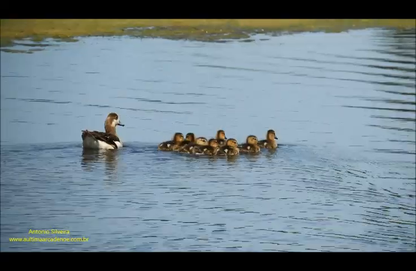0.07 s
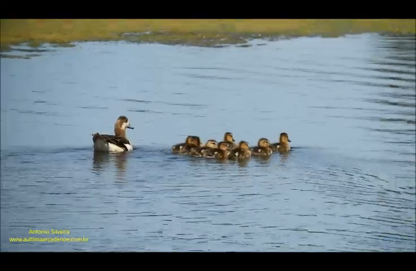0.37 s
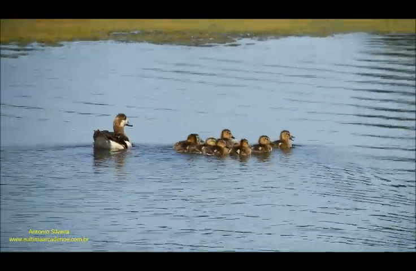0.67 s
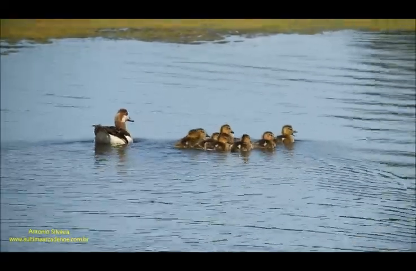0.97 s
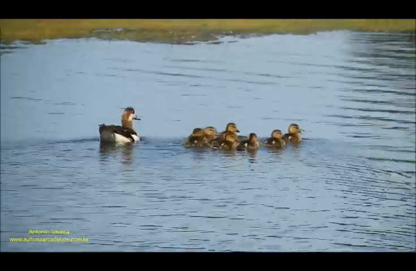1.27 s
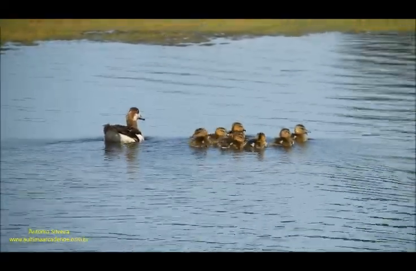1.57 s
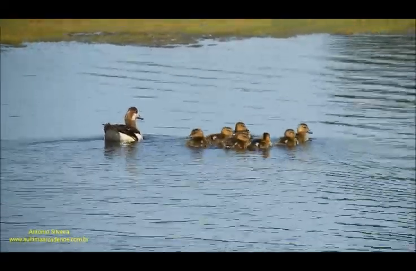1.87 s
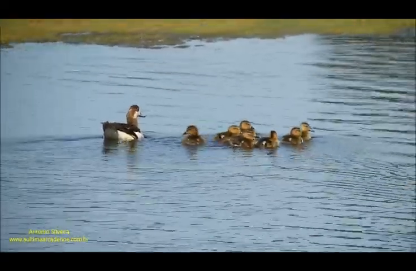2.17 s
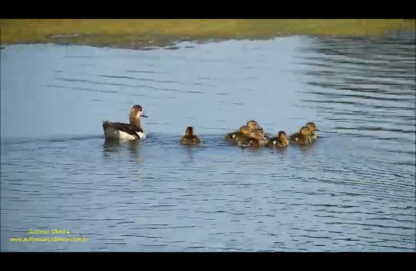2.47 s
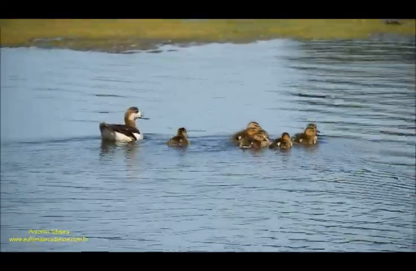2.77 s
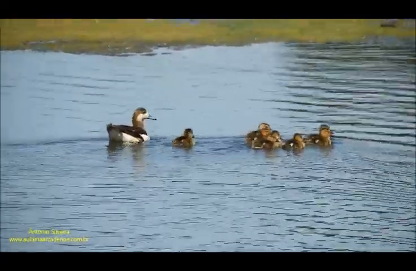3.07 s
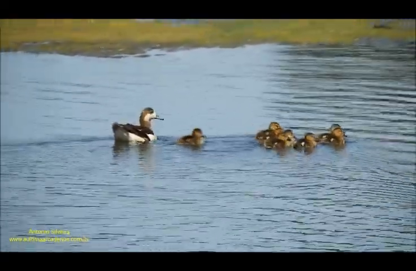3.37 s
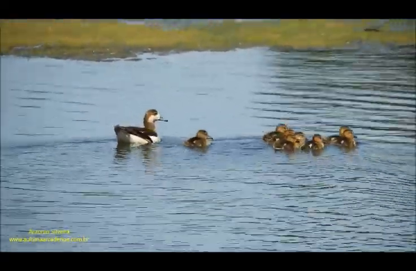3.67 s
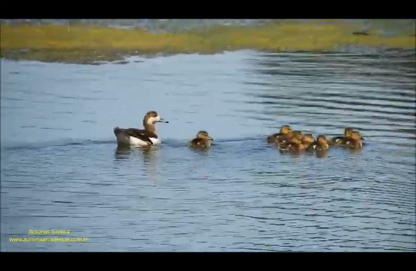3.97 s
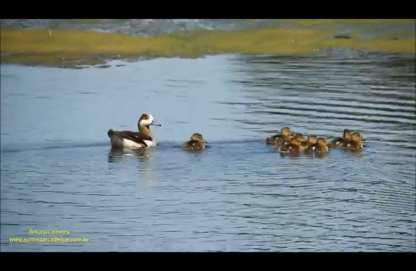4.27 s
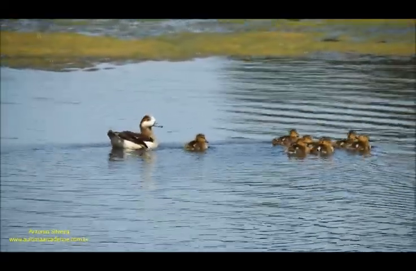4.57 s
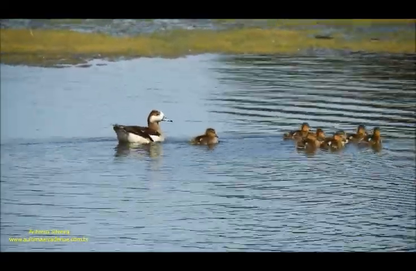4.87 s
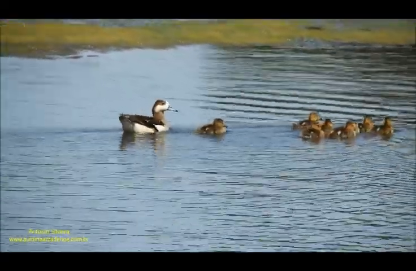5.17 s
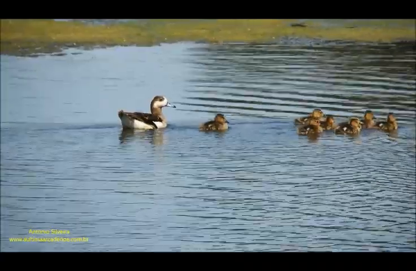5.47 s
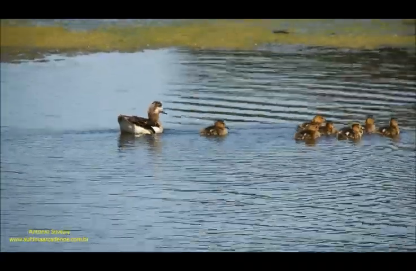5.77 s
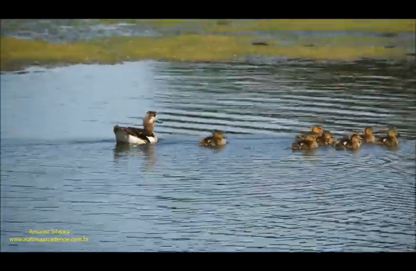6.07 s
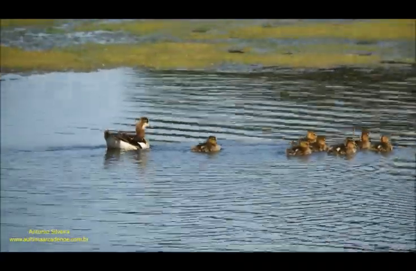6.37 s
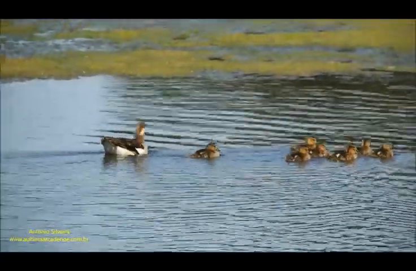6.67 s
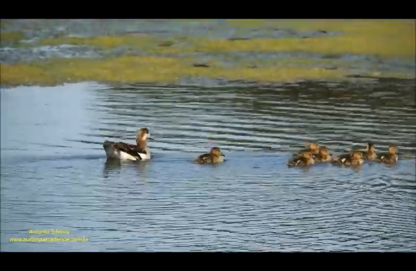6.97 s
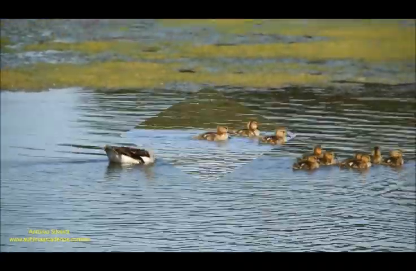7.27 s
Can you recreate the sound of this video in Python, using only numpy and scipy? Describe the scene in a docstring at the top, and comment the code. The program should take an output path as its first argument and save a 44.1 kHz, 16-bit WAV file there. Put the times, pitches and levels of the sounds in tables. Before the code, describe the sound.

Outdoors by a pond, low wind buffets the microphone over a soft hiss and a high, continuous insect buzz. Duckling peeps are faint at first. Once the gusts die down, distant birds twitter briefly, and loud, high peeps and downward whistles follow from ducklings nearby on the left. Just before the end the hiss brightens and the buzz spreads to both sides.

```python
"""Ducklings on a pond

Ducklings swim after their mother with thin arched peeps and long falling whistles, faint at first,
then close and to the left, echoed by the banks. Birds call faintly far away. Two bush crickets buzz
with their wings on the right, over a steady outdoor hiss, and gusts of wind rumble on the microphone.
Near the end a brighter wash of noise comes in and the buzz is heard on both sides."""
import sys
import numpy as np
from scipy import signal
from scipy.fft import rfft, irfft, next_fast_len
from scipy.io import wavfile
from scipy.ndimage import uniform_filter1d

SR = 44100
rng = np.random.default_rng(int(sys.argv[2]) if len(sys.argv) > 2 else 0)


def wav_record(signal):
    """Record a signal, one row per channel, as 16-bit PCM in the file named by sys.argv[1]."""
    frames = np.transpose(np.atleast_2d(signal))
    bounded = np.clip(frames, -1, 1)
    # unit amplitude maps onto the largest positive 16-bit level
    quanta = np.round(bounded * 32767).astype(np.int16)
    wavfile.write(sys.argv[1], SR, quanta)


N = 323694
T = np.arange(N) / SR


def undb(db):
    """Turn decibels into a gain."""
    return 10 ** (np.asarray(db) / 20)


def unit(x):
    """Scale a signal to an average power of 1."""
    return x / np.sqrt(np.mean(x ** 2))


def curves(rows):
    """Join a table's rows with straight lines in time, one curve per column."""
    times, *columns = np.transpose(rows)
    return [np.interp(T, times, column) for column in columns]


def drift(rate):
    """A smooth random wobble of size about 1 that changes about rate times a second."""
    knots = rng.standard_normal(N // 8)
    line = np.interp(T * rate, np.arange(len(knots)), knots)
    return unit(uniform_filter1d(line, max(int(SR / rate / 2), 1)))


def noise(colour):
    """Noise of power 1, with lows and highs shaped by (pitch_hz, level_db) rows."""
    hz, db = np.transpose(colour)
    size = next_fast_len(N)
    bins_hz = np.maximum(np.fft.rfftfreq(size, 1 / SR), 1)
    gain = undb(np.interp(np.log(bins_hz), np.log(hz), db))
    return unit(irfft(rfft(rng.standard_normal(size)) * gain, size)[:N])


def blend(a, b, share):
    """Mix a share of b into a at constant power."""
    share = np.clip(share, 0, 1)
    return np.sqrt(1 - share) * a + np.sqrt(share) * b


def stereo_noise(colour, alike):
    """Left and right noise, from unrelated (alike=0) to the same (alike=1)."""
    common = noise(colour)
    return blend(np.array([noise(colour), noise(colour)]), common, alike)


def phase_of(hz):
    """The running angle of a wave whose pitch changes."""
    return 2 * np.pi * np.cumsum(hz) / SR


# Level of the background murmur, which dips while loud gusts hit the microphone: time_s, level_db
MURMUR_LEVEL = [(.1, -53.5), (.4, -58.5), (.8, -54), (1.8, -55), (2.7, -56.5), (3.4, -62.5), (3.65, -53),
                (4.8, -52.5), (5.6, -52.5), (6.4, -55.5), (7.0, -56)]
# Its tone colour: pitch_hz, level_db
MURMUR_COLOUR = [(100, -20), (250, 2.5), (450, -3.5), (1000, -6.5), (1500, -12), (2300, -13), (4000, -8.5),
                 (9000, -25.5)]


def murmur(boost_db=3.0, swell_db=1.5):
    """A dull murmur from the far shore, in two layers that swell separately."""
    slow, fast = (stereo_noise(MURMUR_COLOUR, alike=.51) * undb(swell_db * drift(rate))
                  for rate in (14, 30))
    lean_left = undb([[.5], [-.5]])
    return blend(slow, fast, .39) * undb(curves(MURMUR_LEVEL)[0] + boost_db) * lean_left


# Level of the hiss: time_s, left_db, right_db
HISS_LEVEL = [(.1, -46, -50), (1.9, -49, -49.5), (3.3, -47, -49), (5.0, -42.5, -46), (7.3, -41, -44)]
# Its tone colour: pitch_hz, left_db, right_db
HISS_COLOUR = [(1460, -19, -10.5), (3490, -10, -8), (3960, -0.5, -11.5), (4580, 4, 1), (5400, 0, -3),
               (6540, -10, 0.5), (8060, -14.5, 2.5), (9530, -18, 3), (11680, -24.5, -8), (13300, -27, -14),
               (16200, -30, -31)]


def hiss(flicker_db=.7):
    """A high, slightly flickering hiss, different on each side."""
    hz, *sides = np.transpose(HISS_COLOUR)
    return np.array([noise(np.column_stack([hz, colour])) * undb(db + flicker_db * drift(14))
                     for colour, db in zip(sides, curves(HISS_LEVEL))])


WASH_START_S = 7.045
# Tone colour of the wash: pitch_hz, level_db
WASH_COLOUR = [(200, 14.5), (500, 6), (1200, 2), (2500, -0.5), (5000, 4), (8000, 5), (10000, 3.5),
               (12000, -12), (15500, -31)]


def wash(level_db=-44, fade_in_s=.0034):
    """A brighter rush of noise that steps in near the end."""
    fade_in = np.clip((T - WASH_START_S) / fade_in_s, 0, 1)
    return stereo_noise(WASH_COLOUR, alike=.41) * undb(level_db) * fade_in


def sliding_note(middle_s, length_s, hz, hz_per_s, db):
    """One soft note that swells and fades while its pitch slides."""
    out, t = np.zeros(N), T - middle_s
    on = np.abs(t) < length_s / 2
    swell = np.cos(np.pi * t[on] / length_s)
    out[on] = np.sqrt(2) * undb(db) * swell * np.sin(phase_of(hz + hz_per_s * t[on]))
    return out


# Low bird calls: middle_s, length_s, pitch_hz, slide_hz_per_s, level_db
FAR_CALLS = [(4.71, .13, 1410, -300, -64), (5.132, .26, 970, -600, -62)]


def far_birds(flicker_db=4):
    """Distant calls that flicker on their way over the water."""
    return sum(sliding_note(*call) for call in FAR_CALLS) * undb(flicker_db * drift(70))


# A lower and a higher chirping voice: pitch_hz, spread_hz, level_db
FAR_VOICES = [(3690, 295, -54), (4610, 450, -52)]


def far_chirps(per_voice=44, span_s=(3.85, 5.5), length_s=.05, slide_hz_per_s=8000, blur_s=.2):
    """Faint chirps at random times and pitches, blurred by the reeds on the way."""
    chirps = np.zeros(N)
    for centre_hz, spread_hz, db in FAR_VOICES:
        for when, pitch, slope, size in rng.uniform(-1, 1, (per_voice, 4)):
            middle_s = np.interp(when, (-1, 1), span_s)
            hz = centre_hz + spread_hz * pitch
            chirps += sliding_note(middle_s, length_s, hz, slide_hz_per_s * slope, db + 2 * size)
    reeds = rng.standard_normal(SR // 2) * undb(-60 * T[:SR // 2] / blur_s)
    return signal.fftconvolve(chirps, reeds / np.sqrt(np.sum(reeds ** 2)))[:N]


# Slow swells of wind: time_s, left_db, right_db
GUSTS = [(.1, -43, -47), (.45, -32, -43), (.65, -48, -48), (1.2, -46.5, -52), (1.45, -37, -45),
         (1.8, -48, -46), (2.05, -38.5, -46), (2.27, -26.5, -44), (2.46, -44.5, -48), (2.7, -35.5, -32.5),
         (2.95, -42, -32.5), (3.07, -27.5, -33), (3.17, -28, -30.5), (3.35, -19, -25), (3.47, -24.5, -22.5),
         (3.56, -36, -42), (3.65, -51, -52), (7.0, -52, -64), (7.04, -38.5, -48), (7.28, -31.5, -32.5),
         (7.34, -37, -34)]
# Short puffs on top of them: time_s, left_db, right_db
PUFFS = [(.175, -31, -48), (.225, -25.5, -34), (.285, -26, -38), (.39, -22.5, -45), (.435, -24.5, -49),
         (.52, -26.5, -38), (1.73, -44, -32.5), (1.994, -49, -28), (2.12, -30, -50), (2.274, -24.5, -45),
         (2.68, -26.5, -46), (2.72, -38, -33), (2.85, -30, -23.5), (2.93, -42, -26.5), (2.989, -32, -22),
         (3.024, -24, -42), (3.1, -15.5, -25), (3.169, -28, -22), (3.237, -18, -29), (3.31, -14.5, -27),
         (3.38, -14.5, -29), (3.445, -30, -19.5)]
# Tone colour of the gusts: pitch_hz, level_db
GUST_COLOUR = [(20, -23), (40, -1), (62, 2), (95, 2.5), (125, -1.5), (190, -13.5), (240, -29), (400, -41),
               (900, -53.5), (8000, -100)]
# Tone colour of the rumble between them: pitch_hz, level_db
RUMBLE_COLOUR = [(20, -22), (45, 0.5), (80, -2), (135, 0.5), (205, -2.5), (255, -23.5), (400, -25.5),
                 (900, -36), (8000, -103)]


def wind(rumble_db=-45, flutter_db=1.16, pitch_ratio=1.31, puff_s=.017):
    """Swirling air hits each side of the microphone, higher in strong gusts, over a steady rumble."""
    power = undb(curves(GUSTS)) ** 2
    for time_s, *sides_db in PUFFS:
        puff = np.exp(-((T - time_s) / puff_s) ** 2 / 2)
        power += np.outer(undb(sides_db), puff) ** 2
    low = stereo_noise(GUST_COLOUR, alike=.3)
    high = stereo_noise([(hz * pitch_ratio, db) for hz, db in GUST_COLOUR], alike=.21)
    high_share = (10 * np.log10(power) + 28) / 10  # none at -28 dB, all at -18 dB
    flutter = undb(flutter_db * np.array([drift(22), drift(22)]))
    gusts = blend(low, high, high_share) * flutter * np.sqrt(power)
    return gusts + stereo_noise(RUMBLE_COLOUR, alike=.91) * undb(rumble_db)


# Level of the two crickets: time_s, lower_cricket_db, higher_cricket_db
CRICKET_LEVELS = [(.1, -47, -50), (2.5, -47.5, -49), (5.0, -53, -50), (7.3, -48, -48)]
# Tone colour of their buzz once the reeds scatter it: pitch_hz, level_db
BUZZ_COLOUR = [(5000, -62), (6900, -3), (7250, 4), (7400, -33), (7560, 1), (7800, 6.5), (8030, -10),
               (8270, 4), (8600, -23), (11000, -46)]


def crickets(notes_hz=(7600, 8310), bend_hz=260, scrape_hz=60, left_db=-15, scattered_share=.26):
    """Each stroke rings the wing on the insect's own note, then the wing swings back silently."""
    strokes_hz, in_step_s = (60.58, 60.82), 2.1  # close rates slide in and out of step
    direct, power = np.zeros((2, N)), 0
    for db, note_hz, stroke_hz in zip(curves(CRICKET_LEVELS), notes_hz, strokes_hz):
        swing = np.cos(2 * np.pi * stroke_hz * (T - in_step_s) + .044 * drift(50))
        speed = np.maximum(swing, 0)
        strength = speed ** .49 * undb(drift(90))
        hz = note_hz - bend_hz * (1 - speed)  # the note sags where the wing is slow
        for side in direct:
            side += undb(db) * unit(strength * np.sin(phase_of(hz + scrape_hz * drift(1500))))
        power += undb(db) ** 2
    scattered = np.sqrt(power) * stereo_noise(BUZZ_COLOUR, alike=0)
    left, right = blend(direct, scattered, scattered_share)
    # the left side is quieter until the wash comes in
    return np.array([left * undb(left_db * (T < WASH_START_S)), right])


# Echoes off the banks: delay_s, left_db, right_db
BANKS = [(0.0206, -12.5, -19.5), (.071, -20.5, -44)]


def pond_echoes(calls, right_db=-18, scatter_db=(-15, -19), die_away_s=.34):
    """Calls arrive directly, then off the banks and scattered by the plants along the shore."""
    t = T[:SR]
    tail = rng.standard_normal((2, SR)) * undb(-60 * t / die_away_s) * np.clip(t / .02, 0, 1)
    paths = tail / np.sqrt(np.sum(tail ** 2, axis=1, keepdims=True)) * undb(scatter_db)[:, None]
    paths[0, 2] += 1  # the direct sound reaches the left side two samples later
    paths[1, 0] += undb(right_db)
    for delay_s, *sides_db in BANKS:
        paths[:, int(delay_s * SR)] += undb(sides_db)
    return signal.fftconvolve(calls[None], paths, axes=1)[:, :N]


# Short peeps: start_s, rise_s, fall_s, top_hz, sag_limit_hz, level_db, swell_slowness, trill_depth,
# rasp_db, thread_db (the thin tone before and after). The last two are relative to level_db.
PEEPS = [(.298, .052, .076, 4470, 1530, -44.5, 1.2, 0.4, -17, -17),
         (.588, 0.054, .06, 4600, 1570, -41, 2.5, 0.36, -13.5, -9),
         (.875, 0.075, 0.049, 4260, 1510, -44, 1.7, 0.14, 0, -8),
         (1.239, 0.072, 0.063, 4490, 1310, -41, 0.93, 0.25, -20, -15),
         (4.905, 0.021, 0.033, 4640, 1620, -45, .3, 0.3, -20, -6),
         (5.896, 0.0043, 0.038, 4520, 1400, -30.5, .2, 0.64, -32, -26),
         (6.085, 0.012, 0.03, 4320, 2000, -31, .2, 0.27, -22, -8),
         (6.325, .132, .025, 4516, 1550, -23, 1, 0.48, -30, -25),
         (6.584, .017, 0.027, 4280, 1680, -26, 0.26, 0.18, -19, -11),
         (6.985, 0.1, 0.032, 4520, 1630, -21, 1.7, 0.44, -26, -20),
         (7.237, 0.014, .021, 4293, 1500, -18, 0.14, .15, -30, -13)]


def peeps(trill_hz=170, octave_db=-33, end_rasp_db=4.0, shimmer_db=5.0, steady_db=-16):
    """Each peep arches in pitch; the duckling's voice box flutters harder and rasps at both ends."""
    lead_s, tail_s, smooth_s = .015, .066, .0017
    max_climb_hz, climb_s = 804, .0339
    swing_hz, jitter_hz, wander_hz, slack_hz = 140, 250, 35, 70
    jitter, unsteady, shimmer, wander, slack = (drift(rate) for rate in (900, 60, 85, 90, 400))
    rasp = noise([(600, -36), (1950, -16), (2550, -4), (3600, 0), (4800, -1), (7000, -25), (15000, -45)])
    out = np.zeros(N)
    for start, rise, fall, top_hz, sag_limit_hz, db, slowness, trill, rasp_db, thread_db in PEEPS:
        on = (T > start - lead_s) & (T < start + rise + fall + tail_s)
        t = T[on] - start
        # arch is -1 at the start, 0 at the top, 1 at the end, and more in the tail
        arch = (t - rise) / np.where(t < rise, rise, fall)
        depth = np.minimum(trill + .25 * np.sin(np.pi / 2 * np.clip(arch, -1, 2)) ** 2, 1)
        flutter = depth * np.sin(phase_of(trill_hz * (1 + .11 * unsteady[on])))
        # a longer rise climbs further
        climb = max_climb_hz * np.tanh(rise / climb_s) * np.minimum(arch ** 2, np.abs(arch))
        sag = sag_limit_hz * arch ** 2 / (2.3 + arch ** 2)
        hz = top_hz - np.where(arch < 0, climb, sag)
        phase = phase_of(hz + swing_hz * flutter + jitter_hz * depth * jitter[on] + wander_hz * wander[on])
        swell = np.maximum(1 - arch ** 2, 0) ** np.where(arch < 0, slowness, .55)
        thread = np.clip(np.minimum(1 + t / lead_s, (rise + fall + tail_s - t) / tail_s), 0, 1) ** 2
        pressure = np.maximum(uniform_filter1d(swell, int(smooth_s * SR)), undb(thread_db) * thread)
        # a weak, unsteady tone follows an octave below
        octave = undb(octave_db) * np.sqrt(pressure) * np.sin(phase / 2 + phase_of(slack_hz * slack[on]))
        tone = np.sqrt(2) * (pressure * np.sin(phase) + octave)
        hoarse = undb(rasp_db + end_rasp_db * arch) * rasp[on] * np.sin(np.pi * np.minimum(arch ** 2, 1))
        # softer peeps have a more ragged level
        ragged_db = shimmer_db * shimmer[on] * np.clip((steady_db - db) / 30, 0, 1)
        out[on] += undb(db + ragged_db) * (1 + flutter) * (tone + hoarse)
    return out


# How strongly the throat rings: pitch_ratio (1 is its favourite pitch), level_db
THROAT = [(.68, -33), (.75, -25), (.8, -19), (.875, -14), (.935, -8.5), (.98, -1.5), (1.0, -0.5),
          (1.052, -5.5), (1.078, -13), (1.2, -20), (1.4, -28)]
# Falling whistles, described at their loudest moment:
# peak_s, lead_s, tail_s, pitch_hz, fall_hz_per_s, ease_s, level_db, throat_sharpness
WHISTLES = [(2.54, 0.039, 0.037, 4710, 4250, .3, -41.5, 1.1),
            (2.695, .06, 0.055, 4250, 5640, 0.99, -51, .1), (3.05, 0.051, 0.064, 4930, 3800, .9, -53, .15),
            (3.18, .07, 0.079, 4220, 4600, 0.54, -50.5, .05),
            (3.72, 0.08, 0.075, 4300, 6560, 0.43, -41, 0.4), (4.125, .04, 0.16, 5150, 11000, .15, -52, .15),
            (5.625, 0.023, 0.031, 4880, 2500, .3, -43.5, .5),
            (5.765, .037, 0.047, 4775, 1060, 0.13, -28, 1.1),
            (5.92, .1, 0.052, 4420, 3320, 0.8, -30.5, 1.9),
            (5.953, 0.011, 0.0088, 5060, 45300, 0.045, -28, 0.87),
            (6.179, 0.055, 0.37, 5035, 8850, 0.34, -17.5, 1.12),
            (6.72, 0.074, 0.28, 5103, 15800, 0.087, -8.5, 1.22),
            (7.118, 0.041, 0.16, 5090, 14950, 0.084, -19.5, 0.72),
            (7.165, .016, 0.02, 4680, 5500, .3, -25.5, .8)]


def whistles(waver_hz=32, attack_s=.015, release_share=.32, shimmer_db=3.0, steady_db=-12):
    """Nearly pure tones drop fast, then level out, loudest where the duckling's throat rings most."""
    out, waver, shimmer = np.zeros(N), drift(350), drift(100)
    for peak_s, lead_s, tail_s, hz, fall_hz_per_s, ease_s, db, sharpness in WHISTLES:
        on = (T > peak_s - lead_s) & (T < peak_s + tail_s)
        t = T[on] - peak_s
        pitch_ratio = np.maximum(1 + t / ease_s, .1) ** (-fall_hz_per_s * ease_s / hz)
        fade = np.clip(np.minimum((t + lead_s) / attack_s, (1 - t / tail_s) / release_share), 0, 1)
        level_db = db + sharpness * np.interp(pitch_ratio, *np.transpose(THROAT))
        # the softer the tone, the more it flickers
        level_db += shimmer_db * shimmer[on] * np.clip((steady_db - level_db) / 30, 0, 1)
        out[on] += fade * undb(level_db) * np.sin(phase_of(hz * pitch_ratio + waver_hz * waver[on]))
    return np.sqrt(2) * out


def scene():
    """Ducklings on the pond, distant birds, crickets, wind and background noise."""
    calls = pond_echoes(peeps() + whistles() + far_chirps())
    return calls + far_birds() + crickets() + wind() + murmur() + hiss() + wash()


def record(dry):
    """The sound starts after a moment of silence, and the highest treble is cut."""
    start_s, top_hz = .103, 15300
    fade_in = np.clip((T - start_s) / .003, 0, 1)
    treble_cut = signal.ellip(12, .2, 95, top_hz, fs=SR, output="sos")
    return signal.sosfilt(treble_cut, dry * fade_in)


dry = scene()
out = record(dry)
wav_record(out)
```